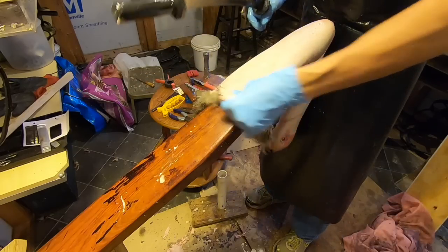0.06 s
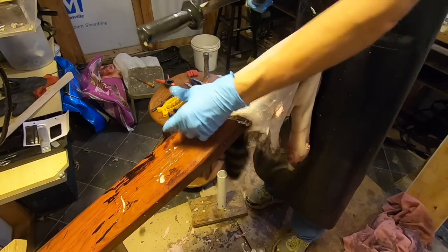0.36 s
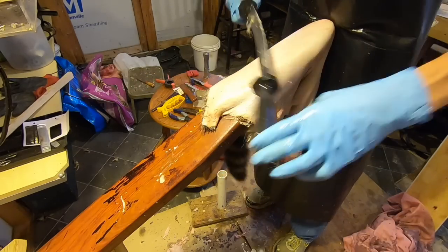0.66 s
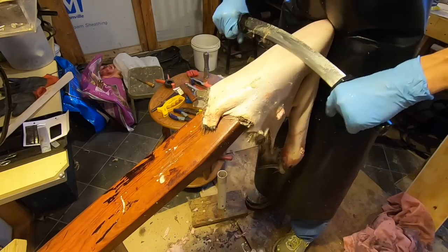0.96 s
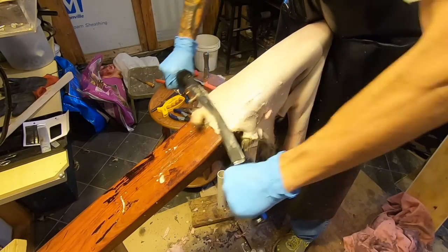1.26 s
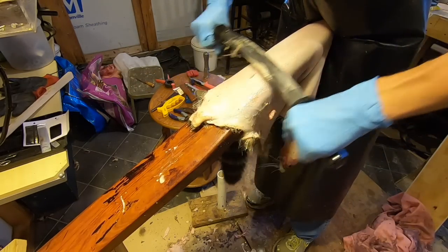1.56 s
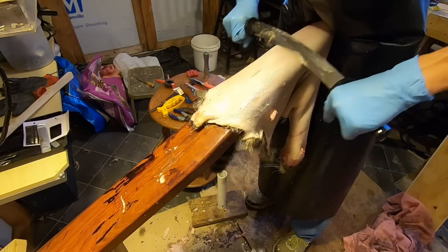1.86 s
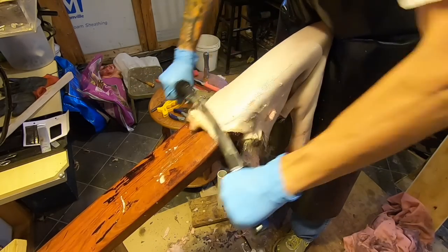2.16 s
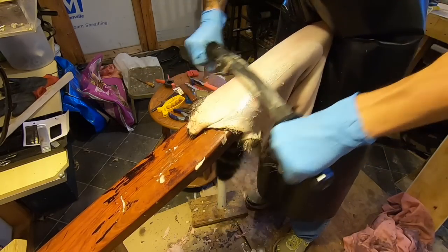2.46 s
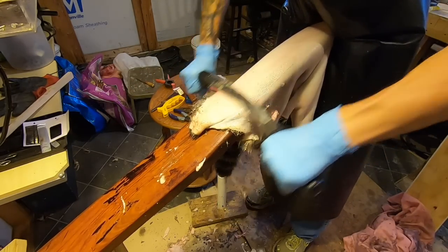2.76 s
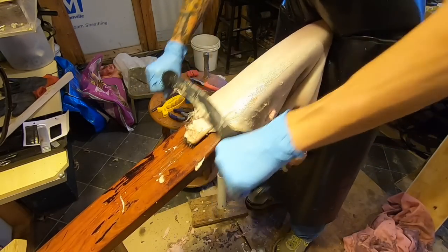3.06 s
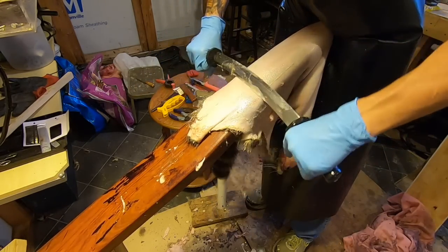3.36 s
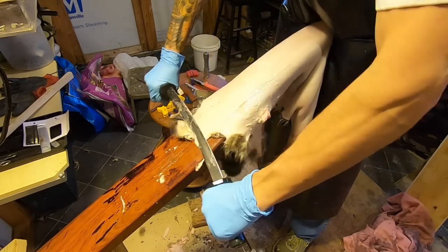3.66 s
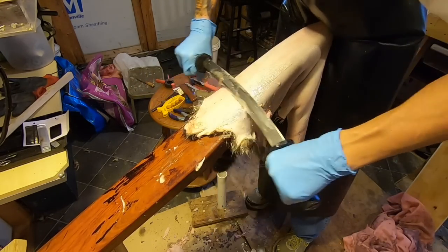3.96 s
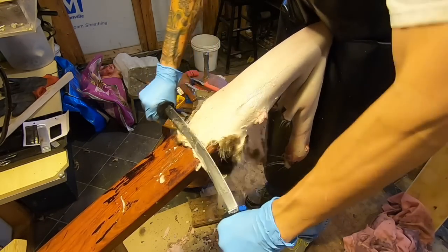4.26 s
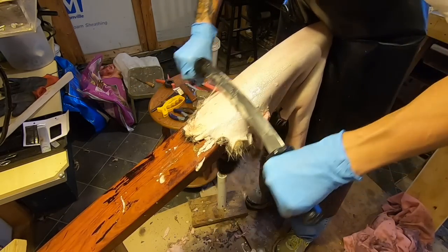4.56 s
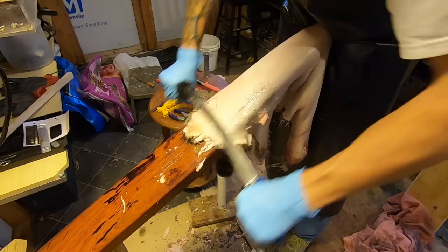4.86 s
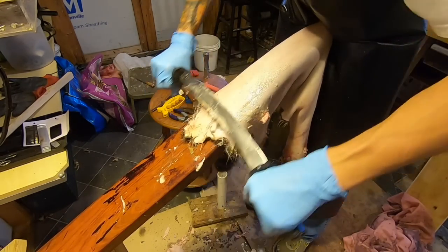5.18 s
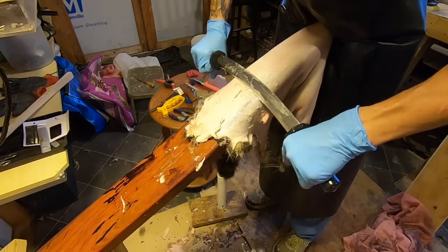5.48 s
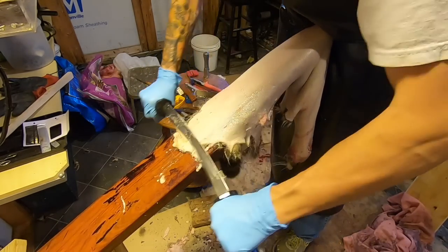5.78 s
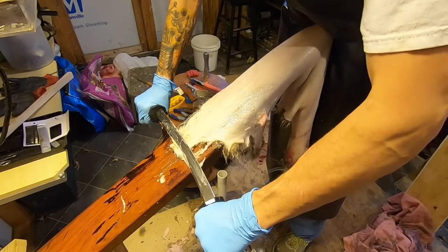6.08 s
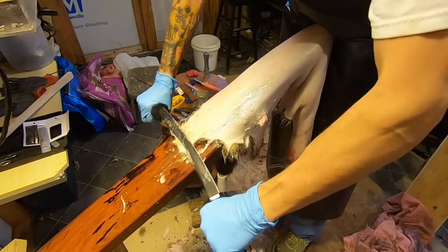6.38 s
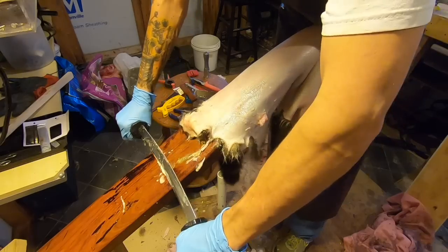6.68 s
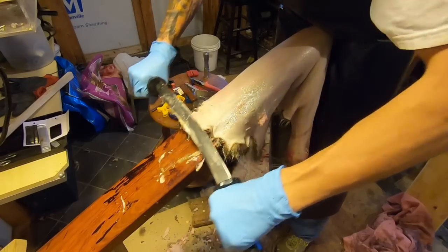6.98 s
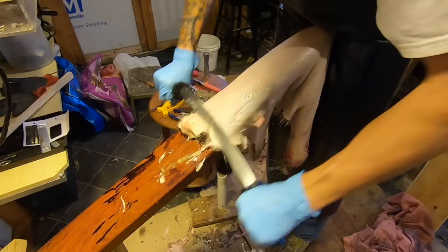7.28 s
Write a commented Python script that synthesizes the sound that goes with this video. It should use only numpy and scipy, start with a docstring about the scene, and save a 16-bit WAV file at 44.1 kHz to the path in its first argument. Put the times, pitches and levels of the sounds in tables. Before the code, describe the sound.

Low rasping scrapes of a blade pushed over damp animal skin, with soft rustles between and one loud knock on wood near the end.

```python
"""A two-handled fleshing knife is pushed down a wet hide on a wooden beam in a small workshop.
The blade sticks and slips, so each stroke judders, rasps, tears fibres and squeezes out moisture,
while the beam bends under the weight with a deep hum. The last stroke slips off the hide and
knocks on the wood. Between strokes, gloves and hide slide and tick over the faint air of the room."""
import sys
import numpy as np
from scipy import signal
from scipy.fft import rfft, irfft, next_fast_len
from scipy.io import wavfile
from scipy.ndimage import uniform_filter1d

SR = 44100
rng = np.random.default_rng(int(sys.argv[2]) if len(sys.argv) > 2 else 0)


def pcm_store(signal):
    """Save signal as 16-bit PCM."""
    levels = np.round(np.clip(np.atleast_2d(signal), -1, 1) * 32767)
    wavfile.write(sys.argv[1], SR, levels.astype(np.int16).T)


N = 323253
TIME = np.arange(N) / SR
FFT_SIZE = next_fast_len(N + SR)
FREQS = np.arange(FFT_SIZE // 2 + 1) * SR / FFT_SIZE

# Levels in the tables are relative: the mix sets the final loudness.
# Pushes of the knife: first touch t/s, full pressure t/s, hold/s, swell/(dB/s), fade/(dB/s),
# first touch level/dB, then level/dB of each part: bend, judder, rasp, tearing, wet hiss
KNIFE_PUSHES = [(1.065, 1.207, 0.075, 184, 145, -16.5, -36, -32, -32, -46.5, -59.5),
                (1.925, 2.086, 0.11, 161, 158, -26, -35, -28, -32.5, -50, -64),
                (2.676, 2.856, 0.058, 160, 154.4, -15, -24.5, -32.5, -33.5, -48.5, -63.5),
                (3.426, 3.584, .058, 235, 177, -22, -42, -36, -39, -50, -62),
                (4.083, 4.191, 0.063, 330, 150, -16.5, -36.5, -35, -40, -46.5, -60.5),
                (4.776, 4.895, 0.077, 330, 153, -22.5, -32, -31, -35.5, -48, -59),
                (5.57, 5.7, .11, 322, 122, -24, -32, -32, -35, -45, -57.5),
                (6.475, 6.597, 0.0075, 200, 161.4, -26, -34.5, -39, -45.5, -47, -61)]
# How those five parts follow a push, one row each: peaks early by/s, lingers/s,
# factors on the swell, fade and first touch, drop as the edge lets go/dB
PART_RESPONSES = [(0.03, 0.066, 0.89, 0.93, 1.06, 3.4), (0.023, 0.031, 1.2, 0.88, 1.3, 6),
                  (0.0002, 0.0035, 1.22, 1.33, 1.47, 2.56), (-0.012, 0.026, 0.86, 0.95, 0.82, 5.75),
                  (-0.016, 0.037, 0.66, 0.87, 0.82, 4)]
# Tone colours of the sounds: f/Hz, level/dB
JUDDER_SPECTRUM = [(70, -23), (100, 4), (120, 5), (160, 2.5), (215, -.5), (255, -2), (320, -15), (700, -35)]   # the beam shaking
RASP_SPECTRUM = [(170, -28.5), (260, -5), (320, 1), (450, -3.5), (555, -4), (640, -8), (850, -12),
                 (1100, -15), (2500, -39)]   # the beam rasping
TEAR_SPECTRUM = [(350, -18), (1100, -.5), (1300, 4), (1500, 0), (2000, 1.5), (2450, -4.5), (3100, -1.5),
                 (4200, -8.5), (5500, -15.5), (8000, -32)]   # fibres tearing
WET_SPECTRUM = [(2500, -12), (4500, 0), (5300, -1.5), (7000, -3.5), (9500, -7), (11200, -20), (14500, -28)]   # wet skin hissing
RUSTLE_SPECTRUM = [(500, -4.5), (850, -1), (1300, 1), (2100, 0.5), (2600, -3), (3300, -3.5), (4300, -9),
                   (5500, -17), (8000, -25.5)]   # loose hide being brushed
AIR_SPECTRUM = [(25, 10.5), (65, -7.5), (106, -10.5), (180, -4), (330, -19), (600, -17), (800, -13.5),
                (950, -17.5), (1900, -21.5), (2600, -32), (9000, -39.5), (14000, -69)]   # the room's air
# Notes the beam rings at with the knife on it: f/Hz, level/dB, time to fade by 60 dB/s
BEAM_NOTES = [(60.6, -8, 0.13), (115, -14, 0.14), (140.1, -9.5, 0.38), (163.6, -10.5, 0.33),
              (208.5, -10, 0.31), (244.5, -5.5, 0.2), (319.4, -10, 0.26), (376, -11, 0.11),
              (551, -5, 0.067), (639, -9.5, 0.15), (678, -10.5, 0.074), (772.3, -2, 0.14),
              (863, -2.5, 0.052), (1270, -13.5, 0.087), (1912, -25.5, 0.24), (3140, -13.5, 0.07)]
# The beam dips as weight comes down on it: t/s, level/dB, pitch of the loaded beam f/Hz
BEAM_DIPS = [(-.025, -38, 66.83), (1.133, -20, 65.75), (1.258, -28, 58.06), (2.021, -23, 60.2),
             (2.129, -21, 60.6), (2.687, -25, 54.26), (3.248, -52, 62.73), (3.446, -29.5, 57.24),
             (3.668, -35, 66.6), (4.092, -24, 55.13), (4.305, -38, 64.2), (4.786, -25, 56.6),
             (5.592, -33, 58.8), (5.828, -29.5, 58.7), (6.562, -26.5, 52.4), (7.293, -28, 54.6)]
# Blade or hand hits the beam: t/s, level/dB, cut-off f/Hz (lower is a softer blow)
BEAM_BLOWS = [(0.459, -45, 130), (0.589, -47, 130), (0.755, -41.5, 480), (.816, -47, 420),
              (0.871, -47.5, 220), (2.691, -40.5, 400), (4.096, -28, 320), (4.788, -45, 298),
              (4.966, -32.5, 496), (6.004, -46, 170), (6.239, -54, 497), (6.601, -16, 1500),
              (6.605, -28.5, 790), (6.617, -23.5, 600), (6.628, -23, 600), (7.303, -24.5, 464)]
# Brief chirps of wet skin under the edge, and the bright ring of the last stroke's knock:
# t/s, level/dB, f/Hz, length/s
NARROW_CHIRPS = [(2.145, -45, 1970, 0.043), (2.201, -43.5, 1910, 0.015), (2.913, -46, 2560, 0.022),
                 (4.181, -46.5, 3260, 0.043), (4.863, -52, 4100, 0.022), (4.864, -47.5, 2000, 0.07),
                 (4.926, -51, 3280, 0.04), (5.691, -46, 3630, .03), (6.521, -55.5, 3020, 0.085),
                 (6.607, -40.5, 2717, 0.015)]
# Small handling ticks, and the sharp crack of the blade hitting the beam: t/s, level/dB, centre f/Hz
TICKS_AND_CRACK = [(0.696, -54, 2760), (0.744, -52, 2920), (0.7529, -43, 1800), (0.813, -50.5, 1780),
                   (1.09, -47, 1500), (1.108, -52, 4970), (2.0293, -52, 1980), (2.373, -48.5, 3100),
                   (2.6237, -61.5, 1550), (2.691, -43, 1460), (3.2524, -63.5, 2000), (4.1048, -40, 1570),
                   (4.788, -53.5, 1840), (5.255, -47.5, 2320), (5.3122, -54, 2500), (5.408, -54, 2050),
                   (5.659, -45, 1750), (6.5982, -29, 2400), (7.1492, -48, 1700), (7.2, -42.5, 1620),
                   (7.2477, -43, 1850), (7.3009, -40.5, 1770)]
# Gloves and blade brush over loose hide: t/s, hold/s, rustle level/dB, wet hiss level/dB
HIDE_BRUSHES = [(0.0, 0.11, -59.5, -71.5), (.15, 0.26, -63.5, -74.5), (.325, 0.031, -61.5, -66.5),
                (.365, 0.022, -57, -57.5), (.5, 0.43, -70, -82.5), (.935, 0.035, -65, -66.5),
                (.99, 0.054, -62.5, -65), (1.42, 0.076, -71, -92), (2.29, 0.0067, -53.5, -74),
                (3.085, 0.02, -64, -76), (3.35, 0.18, -75, -102), (4.5, 0.086, -78, -94),
                (5.139, 0.033, -59, -76), (5.97, 0.026, -56.5, -69), (6.255, 0.055, -57.5, -68),
                (6.43, 0.0083, -58.5, -66.5), (6.69, .15, -54, -70.5)]
# How the two microphone openings differ: f/Hz, left leads by/rad, left is louder by/dB
LEFT_RIGHT_GAPS = [(120, -0.35, -0.9), (250, -.12, -.8), (600, -0.05, -0.3), (850, .8, 1.5),
                   (954, 1.5, -11.5), (1120, 2.4, 9), (1460, 1, 0.5), (2160, 0, 1.5), (7600, .5, -1),
                   (9500, 2.0, 0.2)]


def knife_scrape(ring_db, drag_db, burst_db, burst_s, shift_db, patchy_db):
    """Each slip shakes the beam and works the skin: judder, rasp, tearing and hiss, each at level 1."""
    slips = blade_slips(typical_per_s=150, unevenness=.6, spread_db=2.5)
    drag = from_db(drag_db) * unit_level(grains(per_s=1600, spread_db=1))
    push = unit_level(slips - slips.mean()) + drag
    ringing = from_db(ring_db) * unit_level(beam_ring(push))
    wood = shifting_contact(push + ringing, shift_db, frame_samples=1024, frames=6)
    # every slip frees a short burst of fibres and moisture
    after_slip = signal.lfilter([1], [1, -np.exp(-1 / (burst_s * SR))], slips)
    bursts = 1 + from_db(burst_db) * unit_level(after_slip)
    fibres = bursts * stereo(grains(3000, spread_db=-1), grains(3800, spread_db=3.5), side_db=-20)
    moisture = bursts * stereo(grains(9000, spread_db=4), grains(9000, spread_db=1.5), side_db=-4.5)
    fibres, moisture = [shifting_contact(x, patchy_db) for x in (fibres, moisture)]
    parts = [(wood, JUDDER_SPECTRUM), (wood, RASP_SPECTRUM),
             (fibres, TEAR_SPECTRUM), (moisture, WET_SPECTRUM)]
    return [even_out(colour(x, spectrum), window_s=0.043) for x, spectrum in parts]


def blade_slips(typical_per_s, unevenness, spread_db):
    """The blade sticks and lets go at uneven moments, giving one small kick each time."""
    gaps, sizes = rng.standard_normal((4000, 2)).T
    at = (np.cumsum(np.exp(unevenness * gaps)) * SR / typical_per_s).astype(int)
    force = np.zeros(N)
    force[at[at < N]] = from_db(spread_db * sizes[at < N])
    return force


def shifting_contact(x, depth_db, frame_samples=256, frames=14):
    """The contact keeps shifting, so narrow bands of pitch come and go, each lasting some frames."""
    bands = signal.stft(x, nperseg=frame_samples)[2]
    patches = unit_level(uniform_filter1d(rng.standard_normal(bands.shape[-2:]), size=frames, axis=1))
    return signal.istft(bands * from_db(depth_db * patches))[1][..., :N]


def knife_pushes():
    """Loudness curves of bend, judder, rasp, tearing and wet hiss as the knife is pushed."""
    curves = []
    for part, (early, linger, swell_by, fade_by, touch_by, drop_db) in enumerate(PART_RESPONSES):
        pushes = []
        for touch, full, hold, swell, fade, touch_db, *levels_db in KNIFE_PUSHES:
            press = pressure(touch, full - early, full + hold + linger,
                             swell * swell_by, fade * fade_by, touch_db * touch_by, drop_db)
            pushes.append(from_db(levels_db[part]) * press)
        curves.append(together(pushes))
    return curves


def pressure(touch_s, full_s, ease_s, swell_db_per_s, fade_db_per_s, touch_db, drop_db=0):
    """Loudness of one contact: a light touch, a swell, a hold, a quick drop and a fade."""
    settle_s, let_go_s = 0.028, 0.059   # the edge settles on the skin; it comes free
    landing = np.clip((TIME - touch_s) / settle_s, 0, 1)
    swell_db = np.maximum(-swell_db_per_s * np.maximum(full_s - TIME, 0), touch_db)
    eased_s = np.maximum(TIME - ease_s, 0)
    fade_db = -fade_db_per_s * eased_s - drop_db * np.minimum(eased_s / let_go_s, 1)
    return from_db(swell_db + np.maximum(fade_db, -120)) * landing


def beam_ring(force):
    """A force sets all the beam's notes ringing, and each dies away at its own speed."""
    out = 0
    for k, (hz, db, fade_s) in enumerate(BEAM_NOTES):
        decay, turn = from_db(-60 / (fade_s * SR)), 2 * np.pi * hz / SR   # per sample
        note = signal.lfilter([0, np.sin(turn)], [1, -2 * decay * np.cos(turn), decay ** 2], force + 1e-18)
        out = out + (-1) ** k * from_db(db) * note
    return out


def beam_dips(rise_s):
    """The beam gives way under weight and springs back: its loudness curve and its pitch."""
    start_s, db, hz = np.transpose(BEAM_DIPS)[:, :, None]
    age = np.maximum(TIME - start_s, 0) / rise_s   # 1 at the deepest point
    power = (from_db(db) * age) ** 2 * np.exp(np.maximum(1 - age ** 2, -100)) + 1e-20
    total = power.sum(axis=0)
    return np.sqrt(total), (power * hz).sum(axis=0) / total


def beam_bend(bend, dip, dip_hz, steady_hz):
    """The bending beam hums; a dip pulls the pitch away from that of a steady push."""
    flex = together([bend, dip])
    pitch_hz = steady_hz + (dip_hz - steady_hz) * (dip / (flex + 1e-9)) ** 2
    middle = beam_sway(pitch_hz, wander_hz=7.3, wander_rate_hz=26)
    side = beam_sway(pitch_hz, wander_hz=10.66, wander_rate_hz=30.8)
    return flex * stereo(middle, side, side_db=-11.5)


def beam_sway(hz, wander_hz, wander_rate_hz):
    """The beam's lowest note; its pitch wanders as the load shifts."""
    pitch_hz = hz + wander_hz * unit_level(soften(rng.standard_normal(N), wander_rate_hz))
    return np.sqrt(2) * np.sin(2 * np.pi * np.cumsum(pitch_hz) / SR)


def knocks():
    """Blows of blade or hand, cushioned by the hide, make the beam ring."""
    force = np.zeros(N)
    for start_s, db, cut_hz in BEAM_BLOWS:
        add_at(force, start_s, from_db(db) * soften(signal.unit_impulse(256), cut_hz))
    return beam_ring(force)


def chirps(width_hz):
    """Wet skin under the edge, and one knock's bright ring: narrow noise that starts fast and fades."""
    out = np.zeros(N)
    for start_s, db, hz, length_s in NARROW_CHIRPS:
        age = np.linspace(0, 1, int(length_s * SR))
        noise = keep_band(rng.standard_normal(SR // 4), hz - width_hz / 2, hz + width_hz / 2)
        swell = np.sin(np.pi * np.sqrt(age))
        add_at(out, start_s, from_db(db) * unit_level(noise[-len(age):]) * swell)
    return out


def ticks_and_crack(tail_db, tail_s, snap_db):
    """Handling ticks and the blade's crack on the beam: short bursts, part pitched, part dull snap."""
    out, t = np.zeros(N + SR), TIME[:SR // 5]
    hit = np.exp(-t / .003) - np.exp(-t / .0005)
    tail = from_db(tail_db) * np.exp(-t / tail_s)
    for start_s, db, hz in TICKS_AND_CRACK:
        burst = rng.standard_normal(len(t)) * (hit + tail)
        pitched = keep_band(burst, hz / 1.35, hz * 1.35)
        click = pitched + from_db(snap_db) * keep_band(burst, 700, 6000, order=3)
        add_at(out, start_s, from_db(db) * click / np.abs(click).max())
    return out[:N]


def hide_brushes(lead_s):
    """Loudness curves of rustle and wet hiss as gloves and blade brush the loose hide."""
    curves = []
    for full_s, hold_s, *levels_db in HIDE_BRUSHES:
        press = pressure(full_s - lead_s, full_s, full_s + hold_s,
                         swell_db_per_s=381.5, fade_db_per_s=263, touch_db=-31)
        curves.append(from_db(levels_db)[:, None] * press)
    return together(curves)


def hide_rustle(side_db, patchy_db):
    """Hair and glove slide past each other in thousands of tiny clicks, held at level 1."""
    clicks = stereo(grains(5000, spread_db=3), grains(5000, spread_db=1), side_db)
    return even_out(colour(shifting_contact(clicks, patchy_db), RUSTLE_SPECTRUM), window_s=0.055)


def workshop(x, echo_db, fade_s=0.16):
    """Add the room's short echo, separate for left and right; clutter soaks up the treble."""
    t = TIME[:SR // 2]
    tail = soften(rng.standard_normal((2, len(t))), 7500) * from_db(-60 * t / fade_s) * (t > .004)
    tail /= np.sqrt(np.sum(tail ** 2, axis=1, keepdims=True))
    echo = signal.fftconvolve(np.broadcast_to(x, (2, N)), tail, axes=1)[:, :N]
    return x + from_db(echo_db) * echo


def room_air():
    """The still air of the room: a steady, mostly low noise at level 1."""
    noise = stereo(*rng.standard_normal((2, N)), side_db=-1.5)
    return unit_level(colour(noise, AIR_SPECTRUM))


def from_db(db):
    """Turn decibels into a number to multiply by."""
    return 10 ** (np.asarray(db) / 20)


def unit_level(x):
    """Scale a sound so that its average level (rms) is 1."""
    return x / np.sqrt(np.mean(x ** 2) + 1e-20)


def even_out(x, window_s):
    """Even out slow changes of level and keep the fine grain."""
    power = np.mean(np.atleast_2d(x) ** 2, axis=0)
    return x / np.sqrt(uniform_filter1d(power, int(window_s * SR) + 1) + 1e-12)


def together(curves):
    """Combine loudness curves: separate contacts add in power."""
    return np.sqrt(sum(curve ** 2 for curve in curves))


def add_at(track, start_s, sound):
    """Mix a short sound into a track."""
    start = int(start_s * SR)
    track[start:start + len(sound)] += sound


def grains(per_s, spread_db):
    """Random clicks of uneven size and sign."""
    sizes = from_db(spread_db * np.minimum(rng.exponential(1, N), 4))
    return sizes * rng.choice([-1, 1], N) * (rng.random(N) < per_s / SR)


def stereo(middle, side, side_db):
    """Make left and right from a shared part and an opposite part."""
    return unit_level(middle) + from_db(side_db) * unit_level(side) * np.array([[1], [-1]])


def soften(x, hz):
    """Turn down the treble above hz."""
    return signal.sosfilt(signal.butter(2, hz, fs=SR, output="sos"), x + 1e-18)


def keep_band(x, low_hz, high_hz, order=2):
    """Let through the pitches between two limits."""
    return signal.sosfilt(signal.butter(order, [low_hz, high_hz], "band", fs=SR, output="sos"), x)


def curve_through(points):
    """Join (frequency, value) points into a curve, giving each octave equal room."""
    hz, values = np.transpose(points)
    return np.interp(np.log(FREQS + 1), np.log(hz), values)


def colour(x, spectrum):
    """Give a sound a table's tone colour, falling 18 dB an octave beyond the table's ends."""
    octaves_below = np.maximum(np.log2(spectrum[0][0] / (FREQS + 1)), 0)
    octaves_above = np.maximum(np.log2((FREQS + 1) / spectrum[-1][0]), 0)
    gain = from_db(curve_through(spectrum) - 18 * (octaves_below + octaves_above))
    # minimum phase: the filter rings only after a click, never before it
    cepstrum = irfft(np.log(gain), FFT_SIZE)
    cepstrum[1:] *= 2
    response = np.exp(rfft(cepstrum[:FFT_SIZE // 2], FFT_SIZE))
    return irfft(rfft(x, FFT_SIZE) * response, FFT_SIZE)[..., :N]


def scene():
    """Knife strokes, knocks and handling over the still air of the room."""
    bend, judder_gain, rasp_gain, tear_gain, hiss_gain = knife_pushes()
    dip, dip_hz = beam_dips(rise_s=.04)
    brush, brush_hiss = hide_brushes(lead_s=.1)
    # a dip makes the beam shudder, and the wood passes on some of each brush
    judder_gain = together([judder_gain, from_db(-20.5) * dip, from_db(-6.5) * brush])
    rasp_gain = together([rasp_gain, from_db(-8.5) * brush])
    hiss_gain = together([hiss_gain, brush_hiss])
    judder, rasp, tear, hiss = knife_scrape(ring_db=-14.5, drag_db=-1, burst_db=-15, burst_s=0.014,
                                            shift_db=5, patchy_db=4)
    hum = from_db(2.47) * beam_bend(bend, dip, dip_hz, steady_hz=65.5)
    wood = from_db(1.2) * judder_gain * judder + from_db(1.5) * rasp_gain * rasp
    surface = from_db(0.77) * tear_gain * tear + from_db(4.5) * hiss_gain * hiss
    surface += chirps(width_hz=340)
    surface += brush * hide_rustle(side_db=-11.5, patchy_db=3.5)
    clicks = from_db(3) * ticks_and_crack(tail_db=-11, tail_s=0.024, snap_db=-16.5)
    air = from_db(-60.5) * room_air()
    beam = hum + workshop(wood, echo_db=-16) + workshop(knocks(), echo_db=-7)
    return beam + workshop(surface, echo_db=-13.5) + workshop(clicks, echo_db=-7) + air


def record(dry):
    """Two microphone openings hear some pitches out of step and unequally; rumble and top are cut."""
    gaps = np.array(LEFT_RIGHT_GAPS)
    half_each = np.array([[.5], [-.5]])
    lead_rad, louder_db = curve_through(gaps[:, [0, 1]]), curve_through(gaps[:, [0, 2]])
    response = np.exp(1j * half_each * lead_rad) * from_db(half_each * louder_db)
    heard = irfft(rfft(dry, FFT_SIZE) * response, FFT_SIZE)[:, :N]
    rumble_hz, top_hz = 36, 14600
    heard = signal.sosfilt(signal.butter(3, rumble_hz, "high", fs=SR, output="sos"), heard)
    return signal.sosfilt(signal.cheby2(12, 60, top_hz, fs=SR, output="sos"), heard)


dry = scene()
out = record(dry)
pcm_store(out)
```